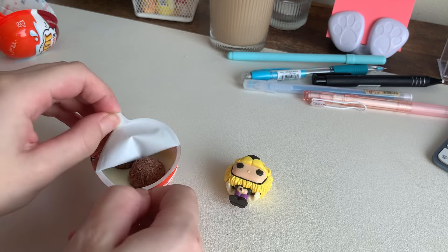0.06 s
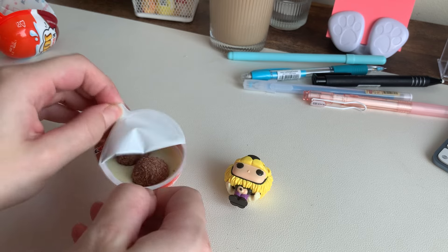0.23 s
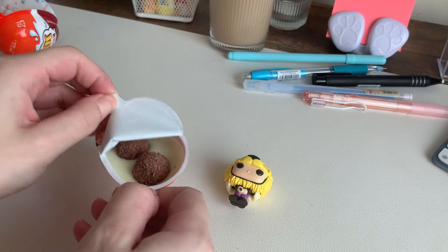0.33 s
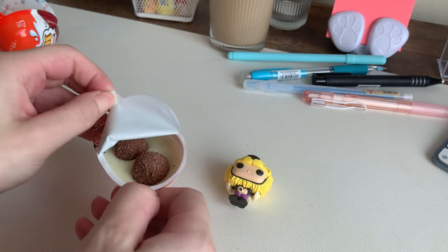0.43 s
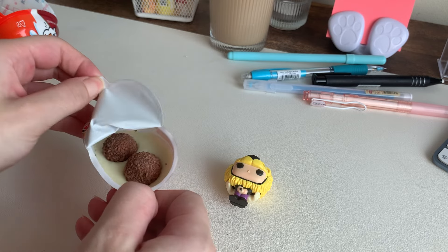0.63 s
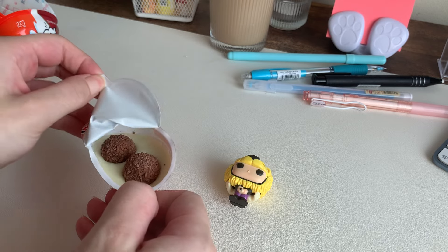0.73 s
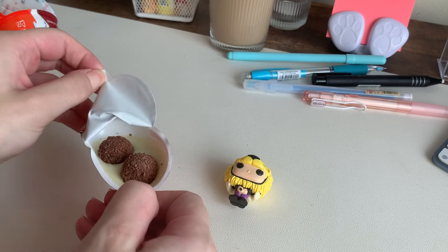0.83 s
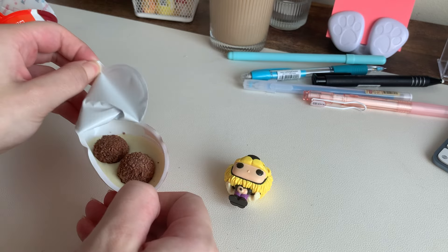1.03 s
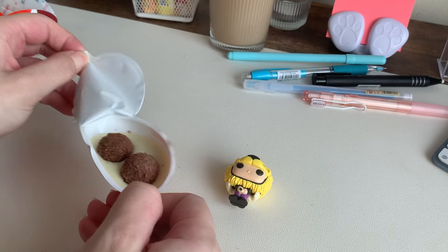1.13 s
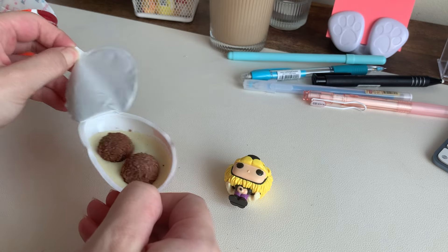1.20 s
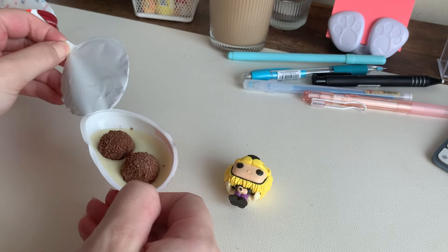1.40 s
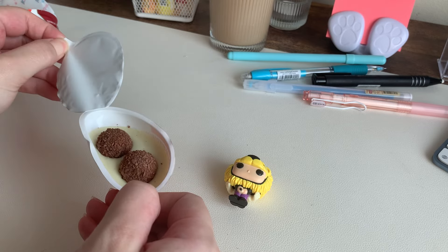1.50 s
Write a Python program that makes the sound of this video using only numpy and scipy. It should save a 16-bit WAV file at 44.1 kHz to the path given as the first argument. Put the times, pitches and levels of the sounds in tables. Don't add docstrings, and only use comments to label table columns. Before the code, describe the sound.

Crisp foil lid peeling from a little plastic cup, snapping and crinkling, close up in a small room.

```python
import sys
import numpy as np
from scipy import signal
from scipy.fft import rfft, irfft
from scipy.io import wavfile

SR = 44100
rng = np.random.default_rng(int(sys.argv[2]) if len(sys.argv) > 2 else 0)


def volts_from_db(level):
    exponent = np.asarray(level, float) / 20
    return 10 ** exponent


def wav_out(sig):
    wavfile.write(sys.argv[1], SR, np.round(np.clip(np.atleast_2d(sig).T, -1, 1) * 32767).astype(np.int16))


N = 68355


def rms_one(x):
    return x / np.sqrt(np.mean(x ** 2) + 1e-20)


def curve(rows):
    return np.interp(np.arange(N) / SR, *np.transpose(rows))


def at_hz(points, hz):
    table_hz, value = np.transpose(points)
    return np.interp(np.log(hz), np.log(table_hz), value)


def drift(rate_hz):
    r = np.exp(-80 * np.pi * rate_hz / SR)
    slow = signal.lfilter([1], [1, -2 * r, r * r], rng.standard_normal(N // 40 + 2002))
    slow = slow[2000:]
    return np.interp(np.arange(N) / 40, np.arange(len(slow)), rms_one(slow))


def peak(x, hz, width_hz):
    r = np.exp(-np.pi * width_hz / SR)
    poles = [1, -2 * r * np.cos(2 * np.pi * hz / SR), r * r]
    return signal.lfilter((1 - r * r) / 2 * np.array([1, 0, -1]), poles, x + 1e-18)


def ring(clicks, hz, t60):
    r = volts_from_db(-60 / (max(t60, .003) * SR))
    w = 2 * np.pi * hz / SR
    return signal.lfilter([0, np.sin(w)], [1, -2 * r * np.cos(w), r * r], clicks + 1e-18)


def grains(per_s, spread_db, size):
    sizes = volts_from_db(spread_db * np.minimum(rng.exponential(1, size), 4))
    sizes = sizes * rng.choice([-1, 1], size)
    return rms_one(sizes * (rng.random(size) < per_s / SR))


def banded(white, spectrum, likeness, patchy_db):
    out, together = 0, drift(3)
    edges = 25 * 2 ** np.arange(0, 9.6, .5)
    for k, (low, high) in enumerate(zip(edges, edges[1:])):
        band = signal.butter(2, [low, high], "band", fs=SR, output="sos")
        mid, side = signal.sosfilt(band, white[k % 2])
        hz = np.sqrt(low * high)
        alike = np.clip(at_hz(likeness, hz), -1, 1)
        flicker = .6 * together + drift(14)
        gain = volts_from_db(at_hz(spectrum, hz) + patchy_db * flicker)
        out = out + gain * (np.sqrt(1 + alike) * mid + np.sqrt(1 - alike) * side * [[1], [-1]])
    return rms_one(out)


# pitch_hz, level_db (per Hz)
AIR_SPECTRUM = [(21, -97), (35, -11.5), (205, -15), (778, -22.5), (930, -18), (1090, -25.5), (4800, -38),
                (11800, -59), (16000, -51)]
# pitch_hz, likeness
DIFFUSE_LIKENESS = [(60, 0.44), (250, 0.42), (700, 0.04), (3000, 0.08), (5500, 0.2), (8000, 0.55),
                    (10500, 0.92), (15000, 0.61)]
# pitch_hz, width_hz, level_db
DRONES = [(67, 18, -49.5), (98.7, 21.7, -47), (145.3, 5.2, -52.5), (299.4, 32.6, -52), (766, 110, -53.5)]
# time_s, level_db
THROB_LEVEL = [(0.0, -29), (0.158, -50), (0.378, -31.5), (0.47, -75), (0.552, -36), (0.634, -52),
               (0.716, -37), (0.902, -39), (0.94, -55), (1.044, -34.5), (1.334, -31.5), (1.354, -43),
               (1.518, -31.5), (1.55, -34)]
AIR_DB, THROB_HZ, THROB_WANDER_HZ = -35, 52, 3.0


def hum():
    white = rng.standard_normal((2, 2, N))
    out = volts_from_db(AIR_DB - 6) * banded(white, [(25, -30)] + list(AIR_SPECTRUM), DIFFUSE_LIKENESS, patchy_db=2.04)
    throb_hz = THROB_HZ + THROB_WANDER_HZ * drift(4.04)
    out = out + volts_from_db(curve(THROB_LEVEL) + 1.0) * np.sin(2 * np.pi * np.cumsum(throb_hz) / SR)
    for hz, width_hz, db in DRONES:
        drone = peak(peak(rng.standard_normal(N + SR), hz, width_hz), hz, width_hz)
        out = out + volts_from_db(db) * rms_one(drone[SR:])
    return out


# pitch_hz, level_db (per Hz)
ROOM_COLOUR = [(100, 11.5), (1000, -4), (3000, 2), (9000, -2.5), (16000, -5.5)]
ROOM_T60_S, ROOM_GAP_S, ROOM_DB = 0.22, 0.00057, -10.5


def room(x):
    t = np.arange(N) / SR
    echo = banded(rng.standard_normal((2, 2, N)), ROOM_COLOUR, DIFFUSE_LIKENESS, patchy_db=2)
    echo = echo * volts_from_db(-60 * t / ROOM_T60_S) * (1 - np.exp(-(t / ROOM_GAP_S) ** 2))
    return signal.fftconvolve(x[None], echo / np.sqrt(np.sum(echo ** 2) / 2), axes=1)[:, :N]


# pitch_hz, level_db
LEFT_OVER_RIGHT = [(200, -2.5), (700, 8.5), (1400, -1), (2700, 0.5), (4000, -4), (5600, -3.5), (7500, -0.5),
                   (14000, 0)]
RIGHT_LAG_S = 0.0002168


def ports(near, diffuse):
    hz = np.arange(N + 1) * SR / (2 * N)
    shade = volts_from_db(at_hz(LEFT_OVER_RIGHT, hz + 1) / 2 * [[1], [-1]])
    lag = np.exp(-2j * np.pi * RIGHT_LAG_S * hz * [[0], [1]])
    return irfft((rfft(near, 2 * N) * shade + rfft(diffuse, 2 * N)) * lag)[:, :N]


# time_s, level_db
RUB_LEVEL = [(.5, -70), (.6, -63), (.68, -59), (.8, -42.5), (.83, -39.5), (.88, -38.5), (.93, -75),
             (1.02, -36)]
RUB_HZ, RUB_WIDTH_HZ, RUB_PER_S = 1180, 550, 540


def rub():
    slips = peak(grains(RUB_PER_S, spread_db=0, size=N), RUB_HZ, RUB_WIDTH_HZ)
    slips = peak(slips, RUB_HZ, 0.87 * RUB_WIDTH_HZ)
    fade_in, fade_out = (RUB_LEVEL[0][0] - .05, -90), (RUB_LEVEL[-1][0] + 0.013, -90)
    return volts_from_db(curve([fade_in] + list(RUB_LEVEL) + [fade_out]) - 2.0) * rms_one(slips)


# time_s, level_db
SHEEN_LEVEL = [(0, -61), (.06, -61), (.15, -69), (.27, -59), (.34, -41), (.42, -64), (.47, -48), (.6, -38),
               (.66, -52), (.7, -66), (.8, -48), (.93, -49), (1.02, -44), (1.09, -38), (1.2, -48),
               (1.3, -42), (1.39, -66), (1.55, -77)]
# pitch_hz, width_hz, level_db
SHEEN_COLOUR = [(4300, 1200, -3.5), (9000, 2300, 2), (13900, 2500, -6.5)]


def sheen():
    fine = grains(9000, spread_db=3.0, size=N)
    hiss = 0
    for k, (hz, width_hz, db) in enumerate(SHEEN_COLOUR):
        hiss = hiss + (-1) ** k * volts_from_db(db) * peak(peak(fine, hz, width_hz), hz, width_hz)
    return volts_from_db(curve(SHEEN_LEVEL) - 4.5 + 2.0 * drift(17)) * rms_one(hiss)


# time_s, level_db
GLUE_TENSION = [(0, -33.5), (.1, -52), (.21, -68), (.237, -60), (.3, -33), (.44, -46.5), (.51, -37),
                (.58, -29.5), (.64, -43), (.72, -50), (.86, -40.5), (.92, -33.5), (.97, -41.5), (1.03, -34),
                (1.14, -32.5), (1.28, -42), (1.37, -59.5), (1.55, -47.5)]
# pitch_hz, level_db (per Hz)
RUSTLE_SPECTRUM = [(290, -33), (500, 1), (761, -8), (2390, -4), (4280, -4.5), (6140, -11.5), (9090, -6),
                   (14500, -30), (16000, -26)]
RUSTLE_PER_S, RUSTLE_DB = 6600, -3


def rustle():
    cracks = grains(RUSTLE_PER_S, spread_db=4.0, size=(2, 2, N))
    spectrum = [(100, -35)] + list(RUSTLE_SPECTRUM)
    likeness = [(100, 0.61), (3000, 0.52), (5500, 0.65), (8000, 0.76), (10500, 0.85), (16000, 0.85)]
    return volts_from_db(curve(GLUE_TENSION) + RUSTLE_DB) * banded(cracks, spectrum, likeness, patchy_db=1.95)


# start_s, level_db (peak), pitch_hz, t60_s
POPS = [(0.1348, -23, 1290, 0.012), (0.2505, -13, 747, 0.019), (0.3128, -13, 432, 0.037),
        (0.3205, -8.5, 1372, 0.039), (.526, -29.5, 700, 0.033), (.583, -27, 805, 0.014),
        (1.051, -13, 744, 0.033), (1.1245, -12, 1380, 0.0069), (1.162, -12.5, 1382, 0.042),
        (1.305, -19.5, 1490, 0.0053), (1.496, -27, 1445, 0.021)]
POP_LONGEST_S = .03


def pops():
    out = np.zeros(N + SR)
    for s, db, hz, t60 in POPS:
        push = np.r_[np.hanning(24) / 12, np.zeros(SR // 4)]
        shudder = rng.standard_normal(SR // 100) * np.linspace(1, 0, SR // 100)
        push[:SR // 100] += 0.076 * shudder
        t60 = min(t60, POP_LONGEST_S)
        sound = ring(push, hz, t60)
        sound = sound - 0.38 * ring(push, 0.818 * hz, 0.52 * t60) + 0.43 * ring(push, 1.075 * hz, t60)
        i = int(s * SR)
        out[i:i + len(sound)] += volts_from_db(db) * sound / np.abs(sound).max()
    return out[:N]


# start_s, level_db (peak)
FLEXES = [(0.178, -19.5), (0.1837, -21), (0.24, -2.5), (0.2465, -28), (0.3126, -10), (0.3182, 2),
          (0.3202, -30), (0.337, -21), (0.3644, -46), (0.6628, -25), (1.0498, -20), (1.148, -15)]
# pitch_hz, level_db, t60_s
CUP_MODES = [(2445, -7, .04), (2628, 0, .07), (2740, -7, .05), (2838, -2, .07), (3030, -7, .04),
             (3311, -10, .04), (2030, -16, .025), (3705, -11, .05), (4050, -8, .04)]
CUP_DB, TREMBLE_DB, TREMBLE_T60_S = -10, -38.5, 0.23


def cup():
    s, db = np.transpose(FLEXES)
    out = np.zeros((2, N))
    uneven = rng.standard_normal((len(s), 3, len(CUP_MODES)))
    since = np.arange(N) / SR - s[:, None]
    tremble = volts_from_db(db[:, None] + TREMBLE_DB - 60 * np.abs(since) / TREMBLE_T60_S) * (since > 0)
    tremble = np.sum(tremble, axis=0)
    for k, (hz, mode_db, t60) in enumerate(CUP_MODES):
        noise = rng.standard_normal(N) + .5 * rng.standard_normal((2, N))
        clicks = volts_from_db(mode_db + CUP_DB) * tremble * noise
        strength = volts_from_db(db + mode_db + CUP_DB + 1.5 * uneven[:, 0, k]) * np.sign(uneven[:, 1, k])
        clicks[:, (s * SR).astype(int)] = strength * (1 + 0.52 * uneven[:, 2, k] * [[1], [-1]])
        out += ring(clicks, hz, t60)
    return out


# start_s, level_db (peak), pitch_hz, trail_t60_s, brightness_db (per octave)
FIRST_SNAPS = [(.0485, -23, 5200, 0.015, 2.5), (.1354, -13.5, 4460, 0.057, -4.5),
               (.1795, -18.5, 2680, 0.036, -15), (.2402, -3, 8500, 0.037, 2.5),
               (.2450, -6.5, 2630, 0.092, -6), (.2505, -20, 13500, .015, -5), (.3116, 1, 9000, 0.032, 5.5),
               (.3162, 5, 3760, 0.027, 2), (.3199, -7, 4580, 0.087, -10), (.3365, -23, 8800, .03, -5),
               (.4364, -29, 8700, .015, -3), (.5246, -7.5, 8700, 0.061, -3), (.565, -18, 3820, 0.045, -2),
               (.582, -5, 3760, 0.045, -1), (.6118, -23, 8500, .02, 10), (.6638, -13, 5170, 0.032, -4),
               (.7736, -26, 9100, 0.029, 0)]
# start_s, level_db (peak), pitch_hz, trail_t60_s, brightness_db (per octave)
LAST_SNAPS = [(1.0291, 2, 8730, 0.025, 3.5), (1.0503, 2, 4300, 0.02, 9), (1.0558, -6.5, 4000, 0.043, -12),
              (1.1254, -6.5, 2800, 0.06, -9), (1.1449, 8, 4400, 0.027, 1), (1.1493, 7, 3750, 0.047, -3.5),
              (1.1552, -4, 3730, 0.022, -8.5), (1.1616, -6, 9700, 0.023, 9), (1.1906, 5, 10100, 0.04, 5.5),
              (1.195, 1, 5900, .02, -5), (1.235, 5.5, 9450, 0.069, 9), (1.2482, -13, 8150, 0.026, -2),
              (1.304, -14, 4250, 0.081, 1.5), (1.4953, -22, 3400, 0.092, -8.5)]
# start_s, level_db (peak), pitch_hz
TICKS = [(.3130, -5, 8800), (.3143, -1, 4650), (.3188, -4.5, 4500), (.3230, -6.5, 4150), (.3395, -28, 4000),
         (1.0322, -14, 9000), (1.0348, -13.5, 5800), (1.0375, -13.5, 4200), (1.0488, -14, 5100),
         (1.0533, -6, 4460), (1.0545, -0.5, 5700), (1.0585, -7, 4150), (1.0605, -8.5, 4160),
         (1.0625, -17, 4000), (1.1380, -21, 4500), (1.1410, -17, 4960), (1.1430, -10, 4960),
         (1.1470, -14, 3850), (1.1525, -9, 4170), (1.1640, -21, 3020), (1.1700, -27, 4470),
         (1.1815, -19, 5500), (1.1928, -10, 8600), (1.1990, -11, 4470), (1.2020, -23, 3500),
         (1.2075, -29, 4500), (1.2160, -37, 4000), (1.2385, -5.5, 9000), (1.2410, -10.5, 8500),
         (1.2440, -12, 5500), (1.2530, -33, 6000)]
# pitch_hz, width_hz, level_db
FOIL = [(4000, 4700, 2.5), (9200, 3870, 9.5), (14700, 4600, -7), (1483, 1840, 0.5), (5800, 6800, -9)]
CRACK_S, TRAIL_DB, TRAIL_PER_S, GRAIN_SPREAD_DB = .0005, -10, 12000, 3.5
CREAK_DB, CREAK_S = -26, 0.002
TICK_T60_S, TICK_BRIGHT_DB = 0.016, -7.5
OWN_WIDTH, OWN_DB = .35, 12.5
SNAP_DB, SIDE_DB_RATIO, SIDE_CUT_HZ = -1, 0.71, 7200


def snaps():
    out, size = np.zeros((2, N + SR)), SR // 5
    lead = SR // 50
    early = np.minimum(np.arange(size) - lead, 0) / SR
    t = np.maximum(np.arange(size) - lead, 0) / SR
    creak = volts_from_db(CREAK_DB) * np.exp(early / CREAK_S) * (t == 0)
    crack = t / CRACK_S * np.exp(1 - t / CRACK_S)
    side_cut = signal.butter(2, SIDE_CUT_HZ, fs=SR)
    ticks = [(*tick, TICK_T60_S, TICK_BRIGHT_DB) for tick in TICKS]
    for s, db, hz, t60, bright_db in list(FIRST_SNAPS) + list(LAST_SNAPS) + ticks:
        trail = volts_from_db(TRAIL_DB - 60 * t / max(t60, .004)) * np.minimum(t / CRACK_S / 2, 1) + creak
        crackle = trail * grains(TRAIL_PER_S, GRAIN_SPREAD_DB, size=(2, size))
        mid, side = rng.standard_normal((2, size)) * crack + crackle
        both = mid + SIDE_DB_RATIO * signal.lfilter(*side_cut, side) * [[1], [-1]]
        sound = volts_from_db(OWN_DB) * peak(both, hz, OWN_WIDTH * hz)
        for k, (foil_hz, width_hz, foil_db) in enumerate(FOIL):
            gain = volts_from_db(foil_db + bright_db * np.log2(foil_hz / 4000))
            sound = sound + (-1) ** k * gain * peak(both, foil_hz, width_hz)
        i = int(s * SR) - lead
        out[:, i:i + size] += volts_from_db(db + SNAP_DB) * sound / np.abs(sound[:, :lead + SR // 200]).max()
    return out[:, :N]


def scene():
    near = snaps() + pops() + cup() + rustle() + sheen() + rub()
    return ports(near, volts_from_db(ROOM_DB) * room(near[0]) + hum())


def roll_off(x):
    return signal.sosfilt(signal.butter(12, 16380, fs=SR, output="sos"), x)


DRIVE_DB, TOP = 2.5, 0.91
LOW_CUT_HZ, HIGH_CUT_HZ = 46.2, 16300


def record(dry):
    high_cut = signal.cheby2(10, 45, HIGH_CUT_HZ, fs=SR, output="sos")
    low_cut = signal.butter(4, LOW_CUT_HZ, "high", fs=SR, output="sos")
    x = signal.sosfilt(high_cut, volts_from_db(DRIVE_DB) * dry)
    x = signal.sosfilt(low_cut, x)
    return roll_off(np.clip(x, -TOP, TOP))


dry = scene()
out = record(dry)
wav_out(out)
```